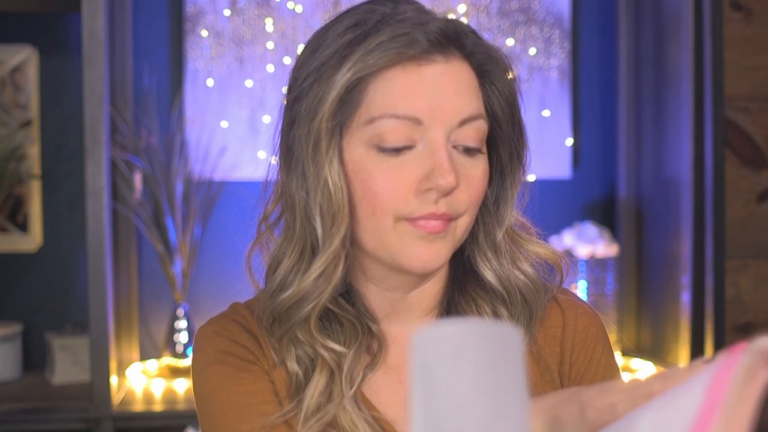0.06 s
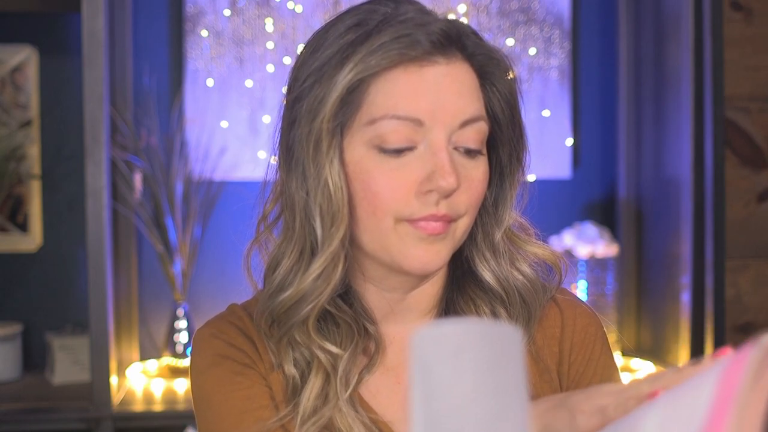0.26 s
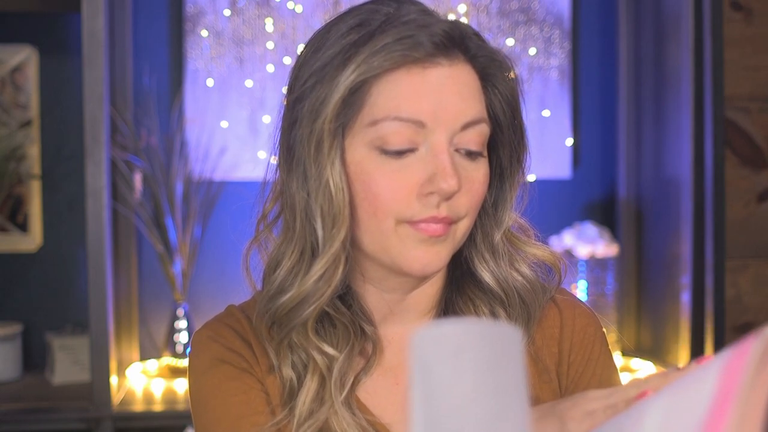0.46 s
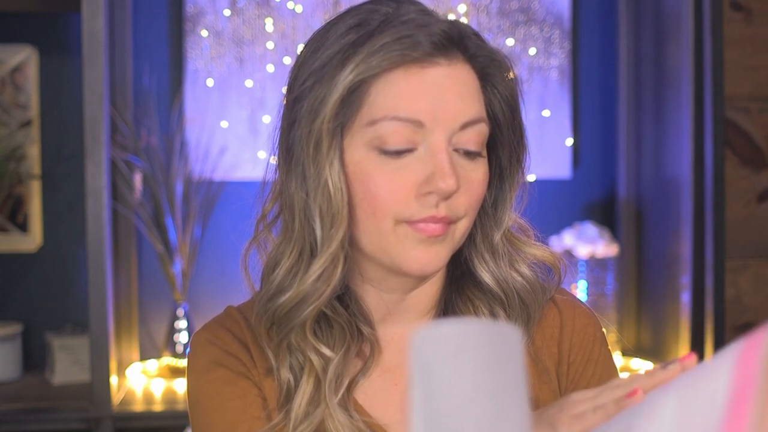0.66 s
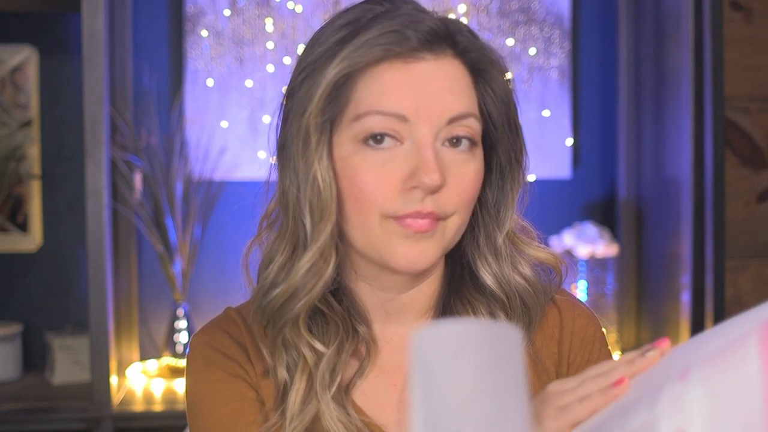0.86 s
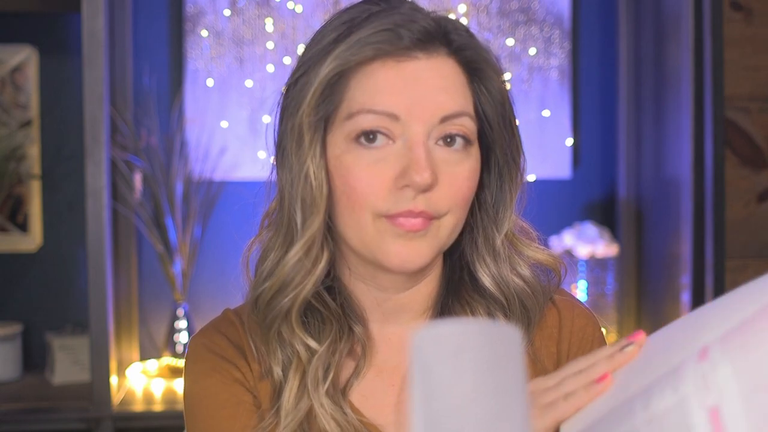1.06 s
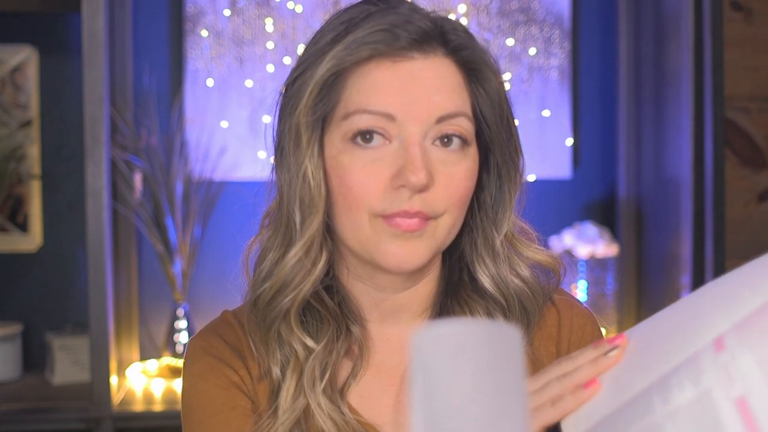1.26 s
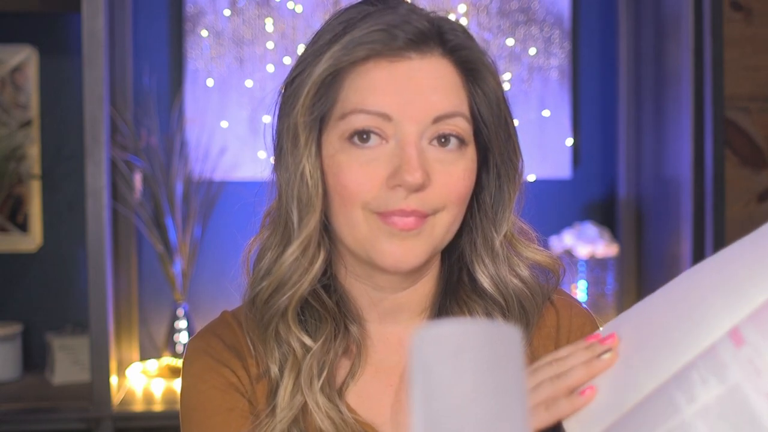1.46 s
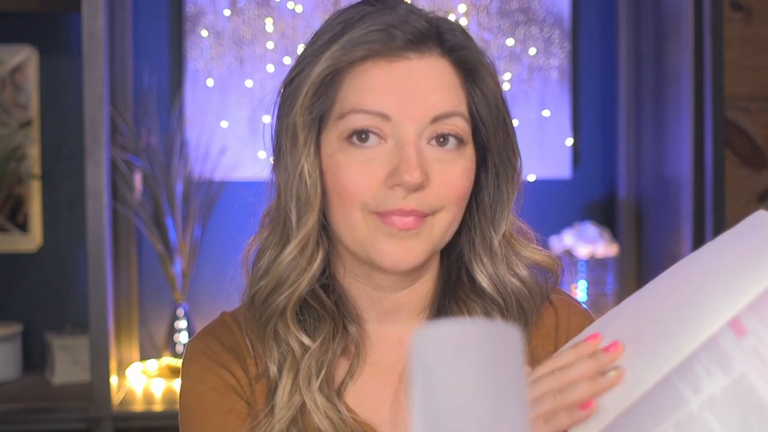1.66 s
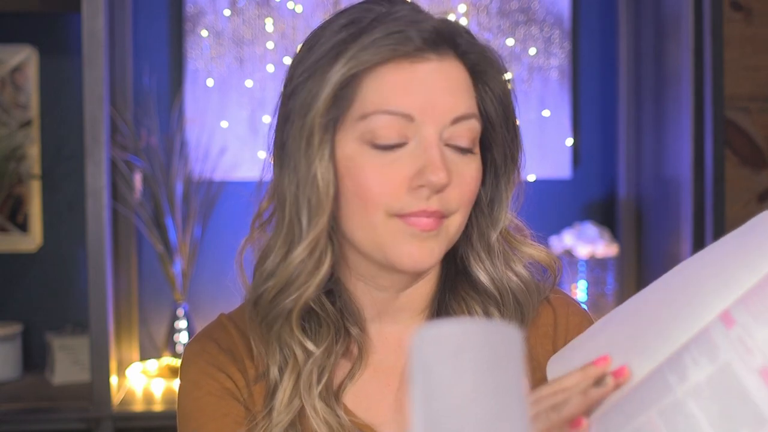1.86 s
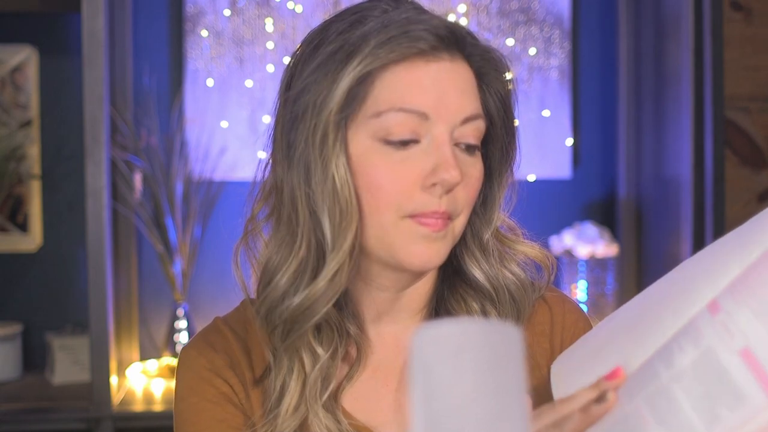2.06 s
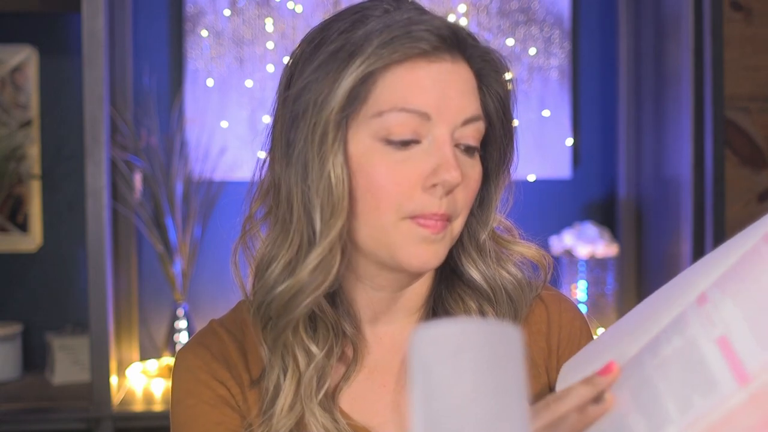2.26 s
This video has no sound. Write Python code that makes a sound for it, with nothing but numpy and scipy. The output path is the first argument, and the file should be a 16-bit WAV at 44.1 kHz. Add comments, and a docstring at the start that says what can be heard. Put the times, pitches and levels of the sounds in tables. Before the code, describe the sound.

Thin book pages rustle under a sliding hand, close and dry. A fine, crisp hiss runs from the start, fading by 0.7 s, with a faint low rumble near 0.2 and 0.55 s and a tiny papery tick at 0.5 s. A softer stroke swells around 1.0 s and dies by 1.4 s. A third, brighter one grows from 1.5 s, uneven, lasting to the end. Quiet room noise and faint hum lie beneath.

```python
"""A fine, papery hiss swells three times as a hand slides over the thin pages of an open book, close up.
One small tick, a soft low rumble and a faint hum with room noise sit around and under it.
The hiss is fibre friction, noise plus random snags, shaped in bands and coloured by an echo off the page.
The tick is a pair of clicks ringing the modes of the sheet; rumble and room are filtered noise,
and the hum is a set of wavering sines."""
import sys
import numpy as np
from scipy import signal
from scipy.io import wavfile
from scipy.ndimage import map_coordinates

SR = 44100
rng = np.random.default_rng(int(sys.argv[2]) if len(sys.argv) > 2 else 0)


def waveform_to_disk(signal):
    """Save audio, clipped to [-1, 1], as 16-bit WAV at the path in sys.argv[1]."""
    frames = np.transpose(np.atleast_2d(signal))
    scaled = np.clip(frames, -1, 1) * 32767
    samples = np.round(scaled).astype(np.int16)
    wavfile.write(sys.argv[1], SR, samples)


N = 101518
TIME = np.arange(N) / SR


def from_db(db):
    """Decibels to an amplitude factor."""
    return 10 ** (np.asarray(db) / 20)


def rms_one(x):
    """Scale a signal to an rms of 1."""
    return x / np.sqrt(np.mean(x ** 2) + 1e-20)


def in_time(rows):
    """Each column of a table as a curve over time, straight between the points."""
    times, *columns = np.transpose(rows)
    return [np.interp(TIME, times, column) for column in columns]


def at_hz(points, hz):
    """Read a spectrum on a log-frequency axis."""
    point_hz, point_db = np.transpose(points)
    return np.interp(np.log(hz), np.log(point_hz), point_db)


def drift(corner_hz):
    """Slow random wander with rms 1: noise through two equal one-pole low-passes."""
    step = 40   # samples between the points of the wander
    pole = np.exp(-2 * np.pi * corner_hz * step / SR)
    noise = rng.standard_normal(N // step + 2002)
    slow = signal.lfilter([1], [1, -2 * pole, pole * pole], noise)[2000:]   # filter has settled
    return np.interp(np.arange(N) / step, np.arange(len(slow)), rms_one(slow))


def butter(x, hz, kind, order=2):
    """Butterworth filter."""
    return signal.sosfilt(signal.butter(order, hz, kind, fs=SR, output="sos"), x)


def ring(clicks, hz, t60):
    """One mode as a resonator: a unit click starts a decaying sine of height 1."""
    pole = np.exp(-np.log(1000) / (t60 * SR))
    turn = 2 * np.pi * hz / SR
    feedback = [1, -2 * pole * np.cos(turn), pole * pole]
    return signal.lfilter([0, np.sin(turn)], feedback, clicks + 1e-18)   # offset avoids denormals


def friction():
    """Force of the fibres: a smooth mass of tiny slips plus sparser snags of uneven size."""
    snags_per_s, snag_spread_db, snag_share = 6000, 4.5, 0.27   # share of the power
    excess_db = snag_spread_db * np.minimum(rng.exponential(1, N), 5)
    sizes = from_db(excess_db) * rng.choice([-1, 1], N)
    snags = rms_one(sizes * (rng.random(N) < snags_per_s / SR))
    slips = rng.standard_normal(N)
    return np.sqrt(snag_share) * snags + np.sqrt(1 - snag_share) * slips


def rubbed_paper():
    """Friction radiated by the page band by band; the stroke sets level, rasp, sheen and air."""
    # the three strokes, before the trims below: (time [s], hiss level [dB],
    # then relative to the hiss: low rasp [dB], high sheen [dB], topmost air [dB])
    first_stroke = [(0.0, -43.5, -5, -8.5, -14), (0.144, -47.5, -1.5, -9.5, -12),
                    (0.194, -47.5, -2.5, -6, -10), (0.574, -50, -4.5, -10.5, -14),
                    (0.654, -57.5, -1.5, -8, -13), (0.73, -72.5, -2, -6, -12)]
    second_stroke = [(0.76, -70.5, -2, -8, -8), (0.844, -55.5, -6.5, -7.5, -12), (0.984, -52, -9, -5, -15),
                     (1.318, -58, -4.5, -4, -15), (1.36, -62.5, -4.5, -7, -16), (1.38, -67.5, -5, -10, -11),
                     (1.43, -82, -12, -7, -11)]
    third_stroke = [(1.45, -73, 5, 3, -11), (1.46, -63, -7, -12, -25), (1.476, -58, -6.5, -12, -16),
                    (1.52, -52.5, -8.5, -5, -18), (1.696, -50.5, -7, -3.5, -13),
                    (1.794, -47.5, -9, -3.5, -9), (1.88, -50.5, -10.5, -8, -17), (1.928, -48, -11, -1, -13),
                    (2.006, -47, -7.5, -3.5, -14), (2.14, -48.5, -9, -5, -11.5), (2.3, -46, -7.5, -5, -13)]
    # low mids of the hiss, before the paper colour: (time [s], level [dB])
    low_mid_levels = [(0, -46), (.3, -47.5), (.55, -48.5), (.72, -58.5), (.78, -59), (.87, -50.5),
                      (1.1, -53.5), (1.33, -59), (1.43, -72), (1.6, -55.5), (1.88, -57.5), (1.93, -48.5),
                      (2.03, -49), (2.12, -50.5), (2.29, -45)]
    # colour of rubbed paper, as band gains: (frequency [Hz], gain [dB])
    paper_colour = [(400, -19.5), (900, -13), (1450, -12.5), (2000, -7), (2800, -2), (4000, 1), (5000, 0.5),
                    (6000, 0.74), (7300, 0), (8700, 1), (11500, -1.4), (13500, -5), (15500, -11)]
    hiss_trim_db, rasp_trim_db, sheen_trim_db, air_trim_db = -0.13, 5, 4.5, 11.5
    low_mids_to_rasp_hz, rasp_to_core_hz = (1630, 2650), (3450, 5830)   # crossfades
    core_hz, sheen_hz, air_hz = 8250, 11600, 14000   # core ends, sheen peaks, air is full
    patchy_db, patchy_corner_hz = 0.61, 8.3   # uneven level, drifting apart in each band

    level, rasp, sheen, air = in_time([*first_stroke, *second_stroke, *third_stroke])
    low_mids, = in_time(low_mid_levels)
    edges = np.geomspace(350, 17000, 25)
    forces = [friction(), friction()]   # neighbouring bands take turns, so they stay independent
    hiss = 0
    for k, (low, high) in enumerate(zip(edges, edges[1:])):
        hz = np.sqrt(low * high)
        treble = level + hiss_trim_db
        treble = treble + (rasp + rasp_trim_db) * np.interp(hz, rasp_to_core_hz, [1, 0])
        treble = treble + (sheen + sheen_trim_db) * np.interp(hz, [core_hz, sheen_hz, air_hz], [0, 1, 0])
        treble = treble + (air + air_trim_db) * np.interp(hz, [sheen_hz, air_hz], [0, 1])
        upper = np.interp(hz, low_mids_to_rasp_hz, [0, 1])
        stroke_db = upper * treble + (1 - upper) * low_mids
        band_db = at_hz(paper_colour, hz) + stroke_db + patchy_db * drift(patchy_corner_hz)
        hiss = hiss + from_db(band_db) * butter(forces[k % 2], [low, high], "band")
    return 2 * hiss


def sliding_hand():
    """The hiss plus its close echo off the page, a comb colour that shifts as the hand moves."""
    # echo off the page: (time [s], lag [ms], share of the direct amplitude [0-1])
    page_echo = [(0, 0.18, 0.086), (.6, 0.18, .15), (.9, 0.42, 0.031), (1.25, 0.32, 0.15),
                 (1.55, 0.33, 0.092), (1.86, 0.336, 0.039), (2.0, 0.26, 0.074), (2.3, 0.26, 0.031)]
    hiss = rubbed_paper()
    lag_ms, share = in_time(page_echo)
    echo = map_coordinates(hiss, [(TIME - lag_ms / 1000) * SR], order=3)   # smooth fractional delay
    return hiss + share * echo


def buckling_sheet():
    """The sheet buckles and settles: two quick snaps excite its heavily damped modes."""
    # snaps: (time [s], click height before the modes and filters [dB])
    snaps = [(0.5111, -31), (.5135, -38.5)]
    # modes of the sheet, before the filters: (frequency [Hz], gain [dB], t60 [s])
    sheet_modes = [(257, -20, 0.013), (816, -23, 0.045), (1026, -16, 0.037), (1400, -29, 0.01),
                   (2000, -13.5, 0.012), (2740, -3, 0.0017), (3500, -3, 0.0038), (4330, -4, 0.0046)]
    times, heights_db = np.transpose(snaps)
    clicks = np.zeros(N)
    clicks[(times * SR).astype(int)] = -from_db(heights_db)
    ringing = sum(from_db(db) * ring(clicks, hz, t60) for hz, db, t60 in sheet_modes)
    tick = butter(ringing, 5300, "low", order=6)   # the soft contact dulls it
    return butter(tick, 250, "high", order=1)   # a thin sheet radiates little bass


def shifting_book():
    """The book shifts in the hand: band-passed noise in two brief, bell-shaped swells."""
    # swells: (time of the peak [s], rms at the peak [dB], time from peak to 1/e [s])
    shifts = [(.215, -60.5, 0.051), (0.562, -64.5, 0.087)]
    swell = sum(from_db(db) * np.exp(-((TIME - peak) / length) ** 2) for peak, db, length in shifts)
    rumble = butter(rng.standard_normal(N), (131, 243), "band")
    return swell * rms_one(rumble)


def appliance_hum():
    """Steady hum and whine of appliances: sines whose level and phase waver gently."""
    # lines: (frequency [Hz], rms level [dB])
    hum_lines = [(70, -66), (120, -71.5), (140, -71.5), (177, -78.5), (293, -81), (414.5, -79),
                 (473.7, -76), (769.8, -81.5), (2963, -76.5), (15468, -78)]
    waver_share, waver_corner_hz = 0.31, 2.8   # share of the amplitude
    hum = 0
    for hz, db in hum_lines:
        waver = 1 + waver_share * (drift(waver_corner_hz) + 1j * drift(waver_corner_hz))
        line = np.real(waver * np.exp(2j * np.pi * (hz * TIME + rng.random())))
        hum = hum + from_db(db) * rms_one(line)
    return hum


def room_noise():
    """Dull, even room noise: white noise weighted band by band."""
    # colour of the room, as band gains before the overall level: (frequency [Hz], gain [dB])
    room_colour = [(25, -13), (45, -4), (65, -0.5), (115, -2.5), (200, -7.5), (400, -10.5), (800, -13),
                   (1500, -22), (3000, -18), (4500, -24.5), (8000, -22), (15000, -30)]
    level_db = -62.5   # rms
    edges = np.geomspace(20, 17000, 21)
    white = rng.standard_normal((2, N + SR))   # one extra second lets the filters settle
    noise = 0
    for k, (low, high) in enumerate(zip(edges, edges[1:])):
        gain = from_db(at_hz(room_colour, np.sqrt(low * high)))
        noise = noise + gain * butter(white[k % 2], [low, high], "band")[SR:]
    return from_db(level_db) * rms_one(noise)


def scene():
    """Hand, sheet, book and room at one microphone, the same in both channels."""
    mono = sliding_hand() + buckling_sheet() + shifting_book() + appliance_hum() + room_noise()
    return np.tile(mono, (2, 1))


def record(dry):
    """A steep elliptic low-pass cuts off the top."""
    cutoff_hz = 15750
    return signal.sosfilt(signal.ellip(12, .1, 70, cutoff_hz, fs=SR, output="sos"), dry)


dry = scene()
out = record(dry)
waveform_to_disk(out)
```